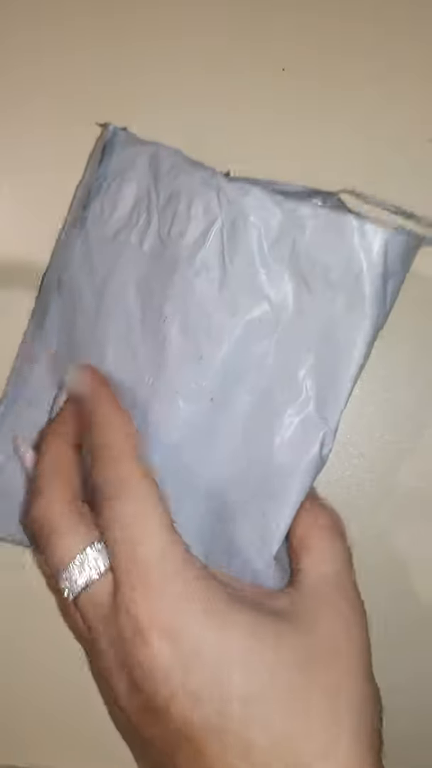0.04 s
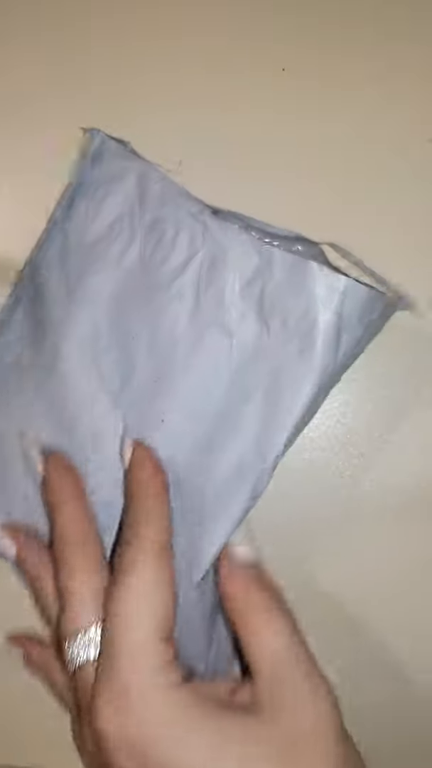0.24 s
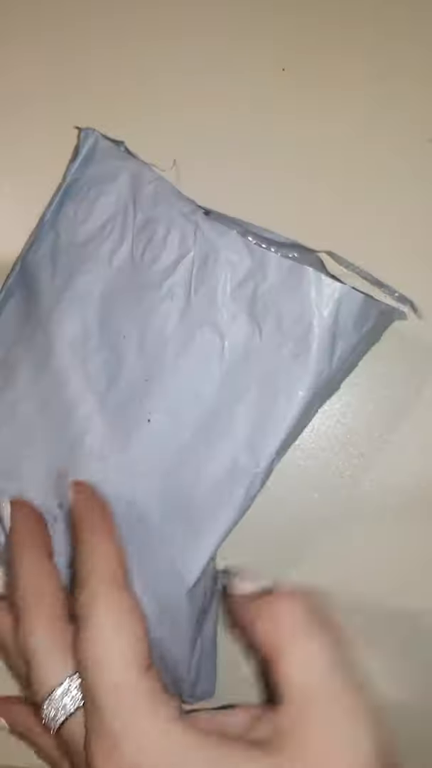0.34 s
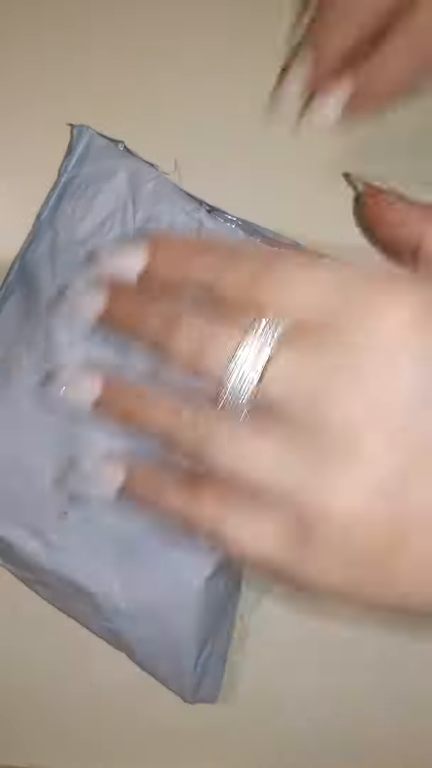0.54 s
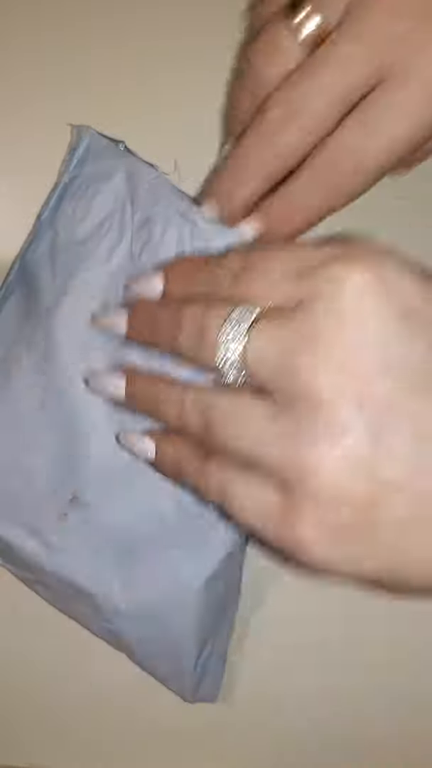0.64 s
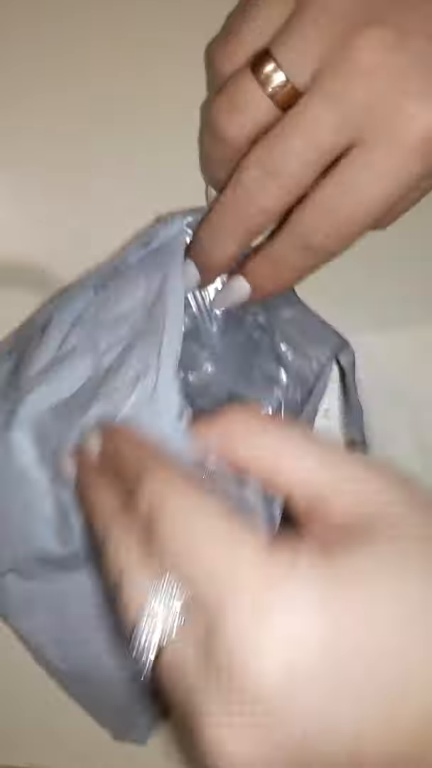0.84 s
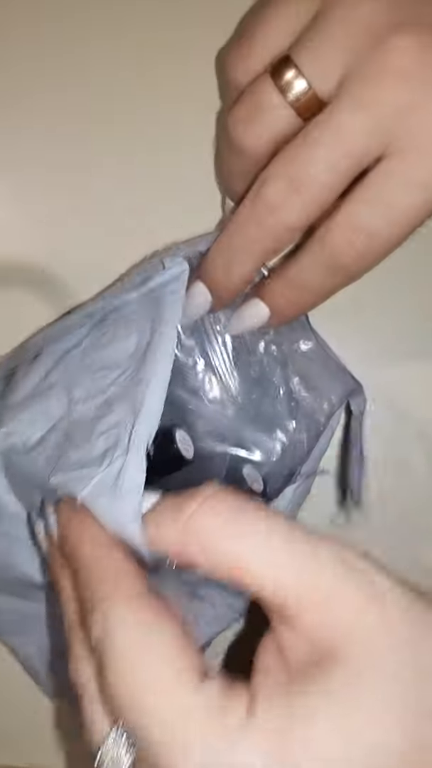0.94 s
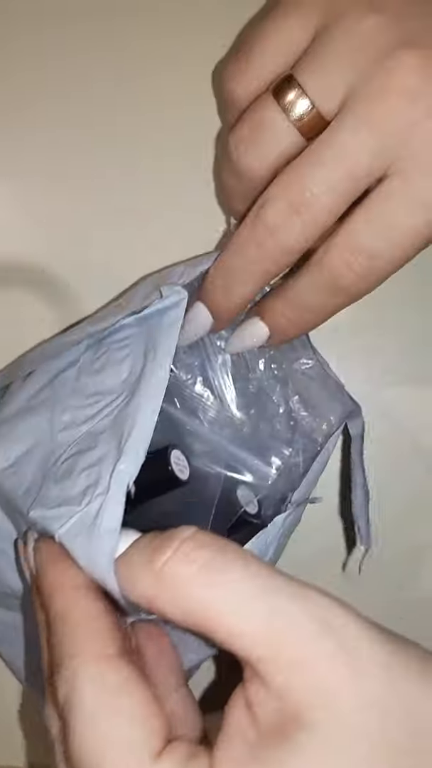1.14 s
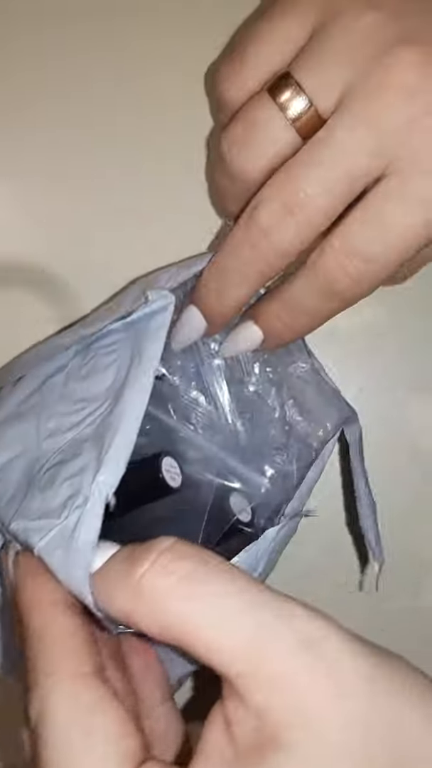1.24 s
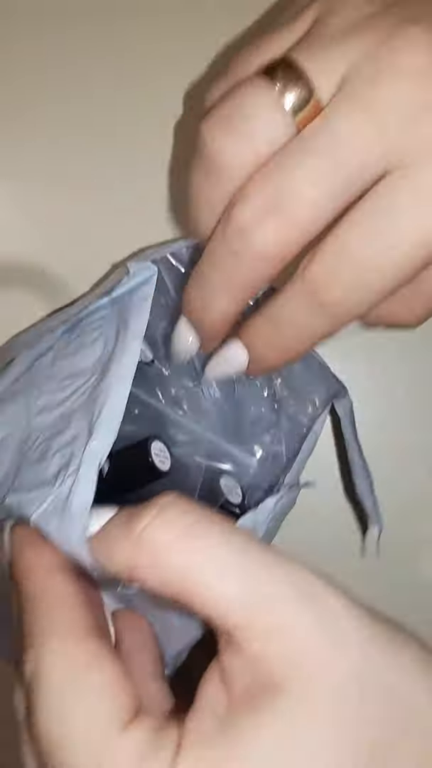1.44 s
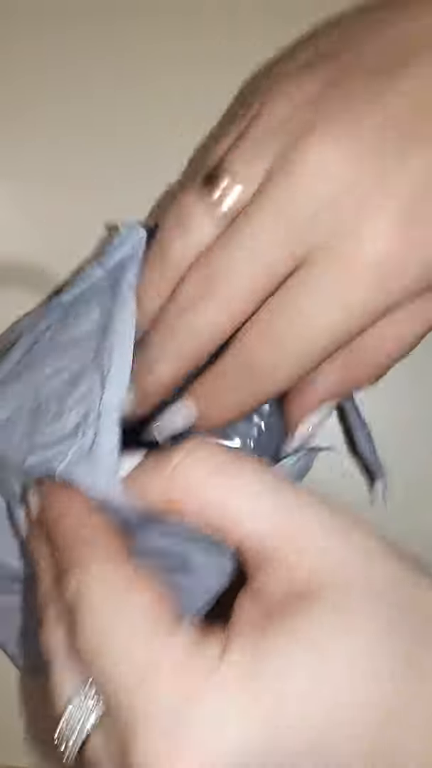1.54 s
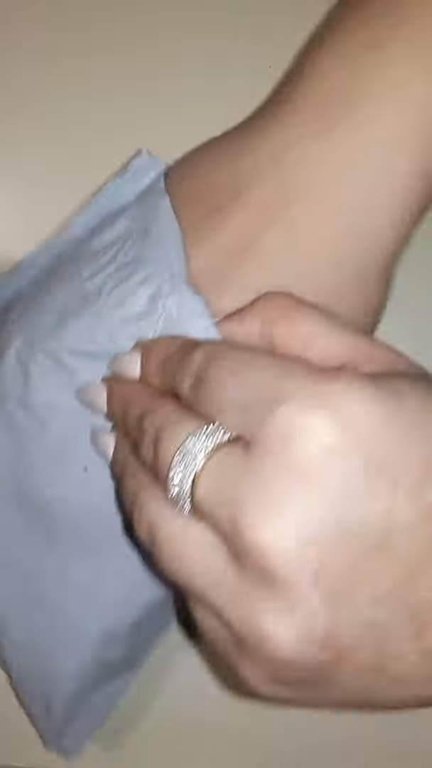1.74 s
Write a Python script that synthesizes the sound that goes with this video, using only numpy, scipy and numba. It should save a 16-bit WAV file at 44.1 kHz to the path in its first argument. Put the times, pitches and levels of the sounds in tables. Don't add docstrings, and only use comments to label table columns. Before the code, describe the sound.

A plastic mailer bag crinkles in sharp snaps, then a hard pull pops it open with a loud hollow thump; thinner film rustles softly, then crackles again as a hand reaches inside. Close phone microphone, small furnished room.

```python
import sys
import numpy as np
from scipy import signal
from scipy.fft import rfft, irfft, next_fast_len
from scipy.io import wavfile
from numba import njit

SR = 44100
rng = np.random.default_rng(int(sys.argv[2]) if len(sys.argv) > 2 else 0)


def wav_out(sig):
    wavfile.write(sys.argv[1], SR, np.round(np.clip(np.atleast_2d(sig).T, -1, 1) * 32767).astype(np.int16))


def level_to_linear(level):
    exponent = np.asarray(level, float) / 20
    return 10 ** exponent


N = 79380

# start in seconds, peak level in dB, pitch of the main patch
# in Hz, level of the tick against the ring in dB, tilt towards high patches in dB per octave.
MAILER_SNAPS = [(0.025, -25, 1140, -33.5, -1), (0.041, -22.5, 1120, -24.5, 4),
                (0.05, -15.5, 1360, -19.5, 3), (0.09, -37.5, 3920, -25, 6), (0.107, -30, 4300, -23.5, 1.5),
                (0.115, -24, 1240, -18.5, 3.5), (0.124, -20.5, 4150, -18, 3.5),
                (0.145, -31, 4680, -25, 8.5), (0.155, -22.5, 1920, -13, 1), (0.166, -17.5, 5290, -17, 0.5),
                (0.17, -22, 1000, -24, -2), (0.18, -37, 1420, -20, -5.5), (0.198, -18.5, 1060, -32.5, 1.5),
                (0.41, -46.5, 3170, -17.5, -1), (0.4280, -22.5, 2950, -15.5, -1),
                (0.4343, -28, 2820, -17.5, 13), (0.4615, -20, 2720, -19, 3), (0.4968, -23, 7050, -13, 5)]
# start in seconds, peak level in dB, pitch of the main patch
# in Hz, level of the tick against the ring in dB, tilt in dB per octave.
OPENING_POPS = [(.2005, -14.5, 3563, -29.5, 1), (0.211, -7.5, 2400, -19, 0.26), (.2140, -5, 1110, -37.5, 1),
                (0.223, -20, 1078, -35.5, -2), (.241, -9, 2400, -19, .5), (0.243, -6.5, 4200, -25, 0.37),
                (0.2638, -16, 2494, -30, 0.67)]
# start in seconds, peak level in dB, pitch of the main patch
# in Hz, level of the tick against the ring in dB, tilt in dB per octave.
INNER_BAG_SNAPS = [(0.68, -42, 1135, -14.5, 1.7), (0.708, -41, 4980, -8.5, 2.5),
                   (0.734, -30, 4920, -15, 1.8), (0.744, -32, 5700, -30, 1.6), (0.758, -32.5, 1310, -30, 1),
                   (0.769, -38, 1220, -25.5, 1.1), (0.788, -31.5, 1173, -11, 1.8),
                   (0.798, -28, 5300, -31, 0.36), (0.81, -39, 2810, -17, 1.4),
                   (0.816, -33.5, 2630, -16, 1.6), (0.828, -25, 4220, -35.5, 3.6),
                   (0.866, -35, 4400, -22, 1.8), (0.877, -38, 1880, -14, 1.5),
                   (0.897, -25.5, 5140, -11.5, 0.84), (0.929, -37, 6400, -23, 1.4),
                   (0.9557, -29.5, 6250, -19, 1.2), (0.9596, -29, 5100, -11, 2.4),
                   (0.9653, -24, 6900, -14.5, 1.5), (0.98, -32.5, 6840, -18, 1),
                   (0.9951, -31.5, 5800, -17, 2.8), (1.001, -31, 6160, -15, 1.1),
                   (1.0605, -29, 1450, -11.5, 1.083)]
# start in seconds, peak level in dB, pitch of the main patch
# in Hz, level of the tick against the ring in dB, tilt in dB per octave.
REACHING_SNAPS = [(1.243, -54, 4940, -30.5, 6), (1.343, -47, 2398, -18.5, 3.5),
                  (1.366, -47.5, 1444, -27, -0.2), (1.38, -49.5, 1454, -30, 3),
                  (1.393, -41, 1440, -22, 6.5), (1.413, -46.5, 3060, -11.5, 1.5),
                  (1.434, -50, 2470, -10, 2), (1.49, -47.5, 1116, -22, -3.5),
                  (1.542, -46.5, 990, -22.5, -4), (1.554, -59.5, 3420, -19, 0),
                  (1.592, -28, 4410, -24, -1.7), (1.631, -22, 5960, -28, 2), (1.638, -38, 3650, 0, -3),
                  (1.647, -31, 6310, -7, 9), (1.652, -31, 5750, -15, 10), (1.671, -41, 1600, -28, -1),
                  (1.7125, -22, 2200, -32, 4), (1.717, -17, 1880, -23.5, 2.5), (1.756, -25, 2980, -7, -4),
                  (1.777, -24, 977, -20.5, 4)]
# start in seconds, peak level in dB, pitch in Hz, length in cycles.
CLEAR_PATCHES = [(.025, -24, 1950, 3.1), (.050, -28, 1130, 4.3), (.050, -20, 4150, 4.6),
                 (.2015, -19, 5750, 5.8), (.2030, -17, 377, 2.5), (.2112, -8, 3420, 24),
                 (.2125, -16, 6200, 14), (.2145, -15, 1060, 18), (.2205, -7, 1065, 18.7),
                 (.222, -6, 2320, 5.8), (.225, -13, 3050, 15), (.2365, -12, 2440, 10),
                 (.255, -20, 704, 3.6), (.270, -20, 2500, 9), (.281, -17, 437, 1.8), (.292, -21.5, 2780, 8),
                 (0.4282, -27.5, 1150, 9.1), (.4288, -37, 5410, 9), (0.4277, -31, 6950, 10.5),
                 (.4345, -29, 1197, 3.8), (.4345, -34.5, 5000, 12), (.4620, -28.5, 1059, 4.7),
                 (.4620, -39, 4215, 7.6), (.4620, -35, 5860, 11), (.485, -34.5, 1405, 2.8),
                 (0.4977, -22.5, 1320, 5.6), (.4978, -23.5, 2846, 8.7), (.4976, -27, 4730, 11),
                 (.4972, -21, 6860, 12), (.8285, -27.5, 3220, 5.2), (0.9677, -26.5, 2476, 7),
                 (0.9654, -30, 3037, 8.5), (1.06, -25.5, 2130, 5.7), (1.061, -32.5, 578, 3.1),
                 (1.06, -35, 5220, 15), (1.0605, -36, 7000, 30), (1.249, -55, 4580, 10.5),
                 (1.3435, -49.5, 5122, 13), (1.357, -56.5, 5500, 10.55), (1.389, -56.5, 4200, 10),
                 (1.396, -53.5, 4200, 8), (1.416, -50.5, 4100, 8), (1.592, -39, 3380, 6),
                 (1.648, -31, 3620, 10), (1.655, -30, 890, 3.5), (1.7175, -21, 1480, 5),
                 (1.7175, -25, 1996, 3.9), (1.736, -23, 1010, 3.7), (1.762, -24, 6700, 15),
                 (1.797, -34, 3500, 7)]
CLEAR_PATCH_SIDE = -0.45, .2
# time in seconds, crackle level in dB, typical patch pitch in Hz,
# level of the high fizz against the crackle in dB.
HAND_EFFORT = [(0, -49, 2200, -6), (.1, -48.5, 2830, -1), (.19, -45, 2660, 2), (.3, -76, 2500, -17),
               (.42, -63, 3300, -10), (.672, -75, 3750, -19), (0.701, -55, 2860, 2.5),
               (0.902, -47.5, 3400, -0.5), (1.01, -60.5, 3630, -25), (1.04, -64.5, 4030, -4),
               (1.2, -80, 4480, -11), (1.318, -78, 4520, -6.5), (1.39, -62, 3006, -1),
               (1.527, -75.5, 2720, -14.5), (1.564, -48, 2760, 4.5), (1.629, -43.5, 3450, 5.5),
               (1.722, -39, 2470, -1), (1.8, -42.5, 2860, 1)]
# pitch in Hz, level in dB, time to fade by 60 dB in seconds.
BODY_TONES = [(137, -9.5, 0.33), (194.6, -9.5, 0.06), (240, -12.5, 0.23), (344, -9.5, 0.018),
              (538.4, -7.5, 0.14), (1066, 1, 0.096), (2240, -11, 0.029)]
# frequency in Hz, level in dB per Hz.
HUM_COLOUR = [(18, -79), (30, -38), (100, -4.5), (174, -11.5), (273, -8.5), (600, -29.5), (3400, -41),
              (4650, -30.5), (16000, -46)]
# frequency in Hz, gain in dB.
MICROPHONE = [(60, -15.5), (250, -4), (520, -5.5), (800, -5.5), (1100, -2.5), (6400, 8.5), (7600, -1),
              (16000, -2.5)]

SNAP_DB, TICK_DB, MAIN_PATCH_DB = -11.5, 6.5, 11
SNAP_LATE_S, SNAP_SPREAD_S, TICK_S = 0.00054, 0.0011, 0.0015
SNAP_CYCLES, MAIN_CYCLES = 4.47, 6.5
CREASE_LOW_HZ, CREASE_HIGH_HZ = 756, 6400
PATCH_SOFTEN, BODY_SOFTEN = 3.42, 14.0
LEFT_DB, UNLIKE_DB, LAG_S = 1.5, 3, 0.00008
CRACKLE_OCTAVES, CRACKLE_CYCLES = 1.166, 4.05
SIZE_SCATTER_DB, SIZE_CAP, BUNCH_DB = 2.8, 4, 1.8
PULL_S, PULL_RISE_S, PULL_HOLD_S = 0.21, 0.006, 0.024
PULL_DB, PULL_FALL_DB_S, PULL_HZ, PULL_FIZZ_DB = -20, 206, 2400, -14.5
BODY_DB, RUMBLE_CUT_HZ, HUM_DB = -13.5, 50, -67.5
ROOM_DB, ROOM_GAP_S, TABLE_DB, TABLE_T60_S = -6.5, 0.0021, -9, 0.026
ROOM_BASS_T60_S, ROOM_T60_S, ROOM_HIGH_T60_S = 0.46, 0.26, 0.2
SHELF_HZ, SHELF_DB, TOP_HZ = 15850, 24, 16600


def snaps(table, count=20):
    s, db, hz, tick_db, tilt_db = np.array(table, float).T[:, :, None]
    s = s + SNAP_LATE_S
    nudge, late = rng.standard_normal((2, len(table), count))
    row_hz = np.geomspace(CREASE_LOW_HZ, CREASE_HIGH_HZ, count) * (1 + 0.12 * nudge)
    row_s = s + SNAP_SPREAD_S * abs(late)
    row_db = db + SNAP_DB + tilt_db * np.log2(row_hz / 2500)
    row = patches(row_s.ravel(), row_db.ravel(), row_hz.ravel(), SNAP_CYCLES)
    main = patches(s.ravel(), (db + SNAP_DB + MAIN_PATCH_DB).ravel(), hz.ravel(), MAIN_CYCLES)
    hits = np.zeros(N)
    hits[(s[:, 0] * SR).astype(int)] = level_to_linear(db + tick_db + TICK_DB)[:, 0]
    fade = signal.lfilter([1], [1, -np.exp(-1 / (TICK_S * SR))], hits)
    tick = fade * rng.standard_normal((2, N))
    return row + main + np.diff(tick, prepend=0, axis=1)


def patches(s, db, hz, cycles, side=None):
    if side is None:
        side = rng.standard_normal((len(s), 2)).T
    hz = np.clip(hz, 260, SR / 2.3)
    ports = []
    for sign in (1, -1):
        start = ((s + sign * LAG_S * side[0]) * SR).astype(np.int64)
        size = level_to_linear(db + sign * (LEFT_DB / 2 + UNLIKE_DB * side[1]))
        ports.append(ring(np.zeros(N), start, hz, 2 * cycles / hz, size, PATCH_SOFTEN))
    return np.array(ports)


@njit
def ring(out, start, hz, t60, size, soften):
    for g in range(len(start)):
        decay = np.exp(-np.log(1000) / (t60[g] * SR))
        turn = decay * np.exp(2j * np.pi * hz[g] / SR)
        swing = size[g] + 0j
        unopened, opening = 1., decay ** soften
        for i in range(max(start[g], 0), min(start[g] + int(t60[g] * SR), len(out))):
            out[i] += swing.imag * (1 - unopened)
            swing *= turn
            unopened *= opening
    return out


def crackle(db_at, hz_at, fizz_at, t0, t1, count):
    s, late = rng.uniform(t0, t1, count), rng.uniform(0, 0.0017, count)
    scatter = np.minimum(rng.exponential(1, (2, count)), SIZE_CAP)
    bunches = count // 40
    bunch = np.interp(s, np.linspace(t0, t1, bunches), rng.standard_normal(bunches))
    hz = hz_at(s) * 2 ** (CRACKLE_OCTAVES * rng.standard_normal(count))
    db = db_at(s) + SIZE_SCATTER_DB * scatter + BUNCH_DB * bunch
    fizz_hz = rng.uniform(7000, 17000, count)
    creases = patches(s, db[0], hz, CRACKLE_CYCLES)
    return creases + patches(s + late, db[1] + fizz_at(s), fizz_hz, 2 * CRACKLE_CYCLES)


def effort_crackle():
    s, db, hz, fizz_db = np.array(HAND_EFFORT, float).T

    def follow(values):
        return lambda t: np.interp(t, s, values)

    return crackle(follow(db), follow(hz), follow(fizz_db), 0, N / SR, count=12000)


def pull_db(s):
    since = s - PULL_S
    rise = 20 * np.maximum(-since / PULL_RISE_S, 0)
    return PULL_DB - rise - PULL_FALL_DB_S * np.maximum(since - PULL_HOLD_S, 0)


def pull_crackle():
    return crackle(pull_db, lambda t: PULL_HZ, lambda t: PULL_FIZZ_DB, PULL_S, PULL_S + 0.22, count=1100)


def body():
    s, db = np.array(OPENING_POPS, float).T[:2, :, None]
    hz, tone_db, t60 = np.array(BODY_TONES, float).T
    chance = rng.standard_normal((len(OPENING_POPS), len(BODY_TONES)))
    start = ((s + 0.0022 * abs(chance)) * SR).astype(np.int64)
    pitch = hz * (1 + 0.018 * chance)
    size = level_to_linear(db + tone_db + BODY_DB)
    fade = t60 + 0 * s
    thump = ring(np.zeros(N), start.ravel(), pitch.ravel(), fade.ravel(), size.ravel(), BODY_SOFTEN)
    return np.array([thump, thump])


def room(x):
    t = np.arange(SR // 2) / SR
    noise, near = rng.standard_normal((2, 2, len(t)))
    bass = signal.sosfilt(signal.butter(2, 350, fs=SR, output="sos"), noise)
    low = signal.sosfilt(signal.butter(2, 3000, fs=SR, output="sos"), noise)
    near = signal.sosfilt(signal.butter(2, 400, "high", fs=SR, output="sos"), near)
    alike = bass[:1] + 0.1 * bass[1] * np.array([[1], [-1]])
    tail = alike * level_to_linear(-60 * t / ROOM_BASS_T60_S)
    tail = tail + (low - bass) * level_to_linear(-60 * t / ROOM_T60_S)
    tail = tail + (noise - low) * level_to_linear(-60 * t / ROOM_HIGH_T60_S)
    tail = tail * (1 - np.exp(-t / ROOM_GAP_S))
    table = near * level_to_linear(-60 * t / TABLE_T60_S)

    def unit(h):
        return h / np.sqrt(np.sum(h ** 2, 1, keepdims=True))

    echoes = level_to_linear(ROOM_DB) * unit(tail) + level_to_linear(TABLE_DB) * unit(table)
    return signal.fftconvolve(x, echoes, axes=1)[:, :N]


def hum():
    mid, side = colour(rng.standard_normal((2, N)), HUM_COLOUR)
    side = signal.sosfilt(signal.butter(1, 400, "high", fs=SR, output="sos"), side)
    return level_to_linear(HUM_DB) * np.array([mid + side, mid - side]) / np.std(mid)


def colour(x, points):
    size = next_fast_len(2 * N)
    hz, db = np.array(points, float).T
    log_hz = np.log(np.fft.rfftfreq(size, 1 / SR) + 1)
    log_gain = np.interp(log_hz, np.log(hz), db) * np.log(10) / 20
    cepstrum = irfft(log_gain, size)
    cepstrum[1:size // 2] *= 2
    cepstrum[size // 2 + 1:] = 0
    return irfft(rfft(x, size) * np.exp(rfft(cepstrum)), size)[..., :N]


def scene():
    bag = sum(snaps(t) for t in (MAILER_SNAPS, OPENING_POPS, INNER_BAG_SNAPS, REACHING_SNAPS))
    bag = bag + patches(*np.array(CLEAR_PATCHES, float).T, CLEAR_PATCH_SIDE)
    bag = bag + effort_crackle() + pull_crackle() + body()
    bag = signal.sosfilt(signal.butter(3, RUMBLE_CUT_HZ, "high", fs=SR, output="sos"), bag)
    return colour(bag + room(bag), MICROPHONE) + hum()


def low_pass(x):
    return signal.sosfilt(signal.butter(12, 16810, fs=SR, output="sos"), x)


def record(dry):
    x = np.clip(dry, -0.9, 0.9)
    x = signal.sosfilt(signal.ellip(6, 0.3, SHELF_DB, SHELF_HZ, fs=SR, output="sos"), x)
    x = signal.sosfilt(signal.ellip(8, 0.3, 60, TOP_HZ, fs=SR, output="sos"), x)
    return low_pass(x)


dry = scene()
out = record(dry)
wav_out(out)
```